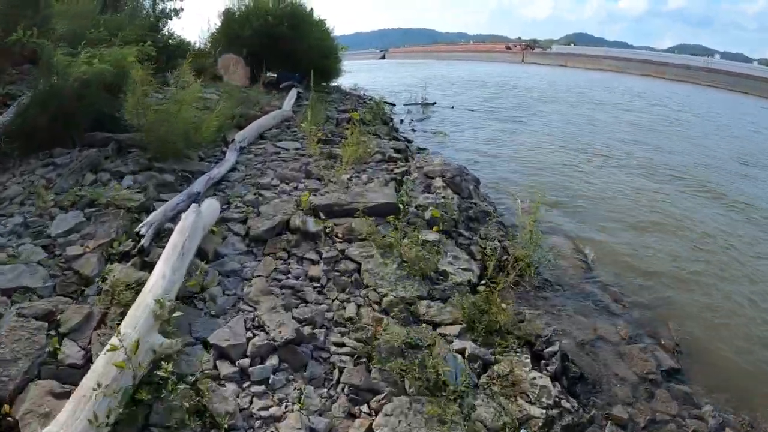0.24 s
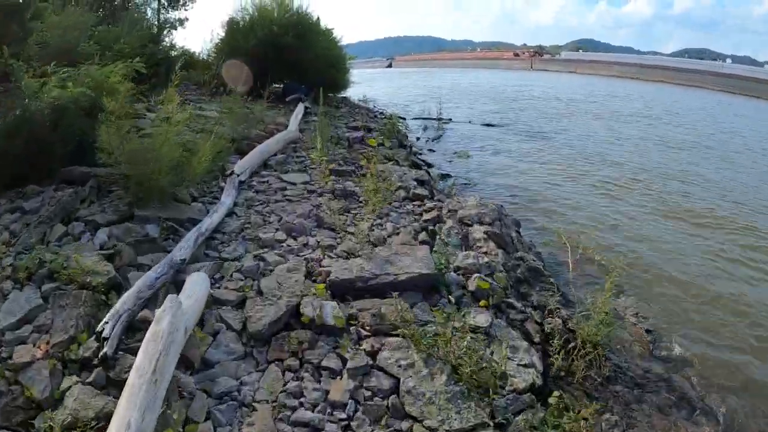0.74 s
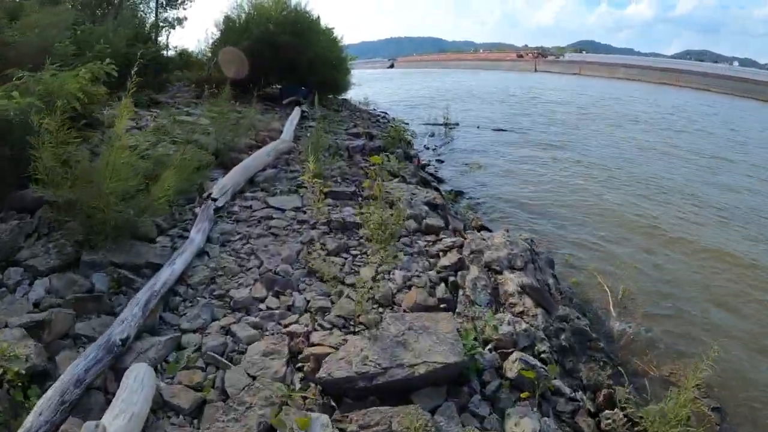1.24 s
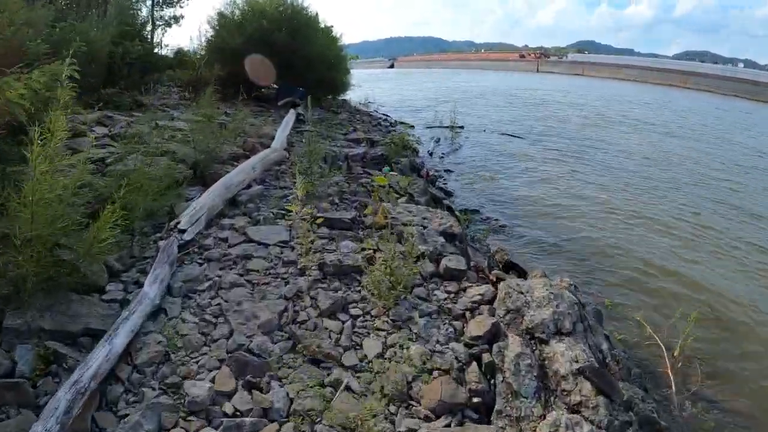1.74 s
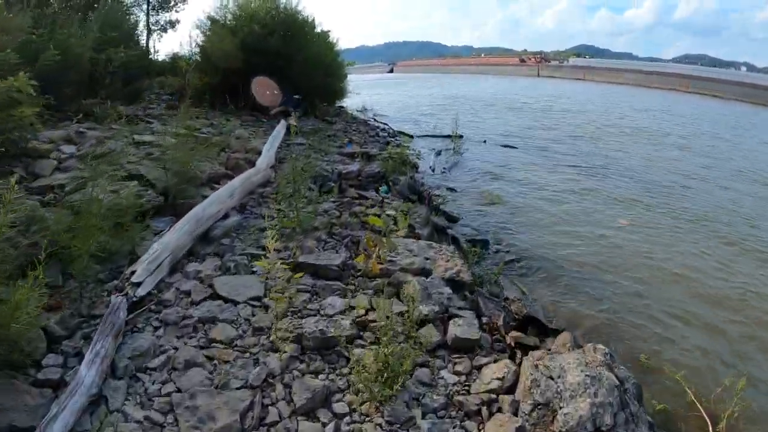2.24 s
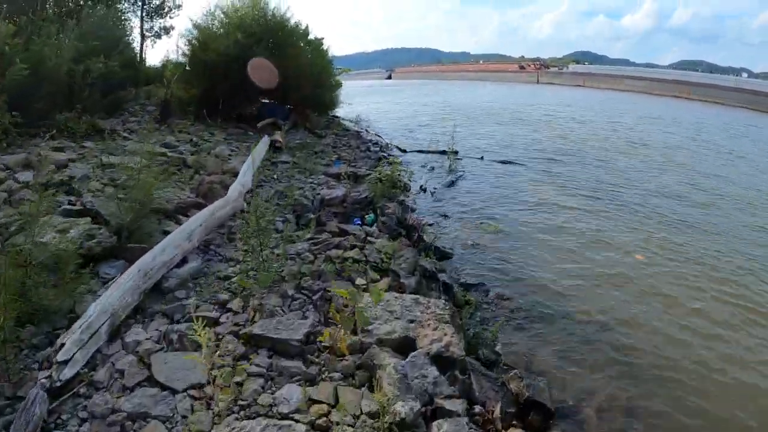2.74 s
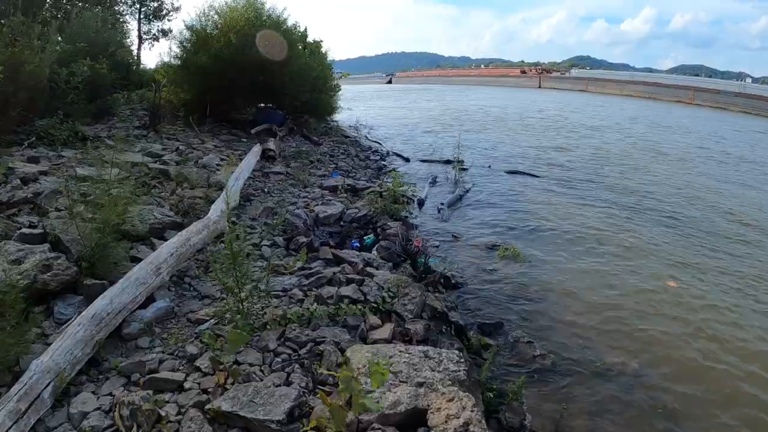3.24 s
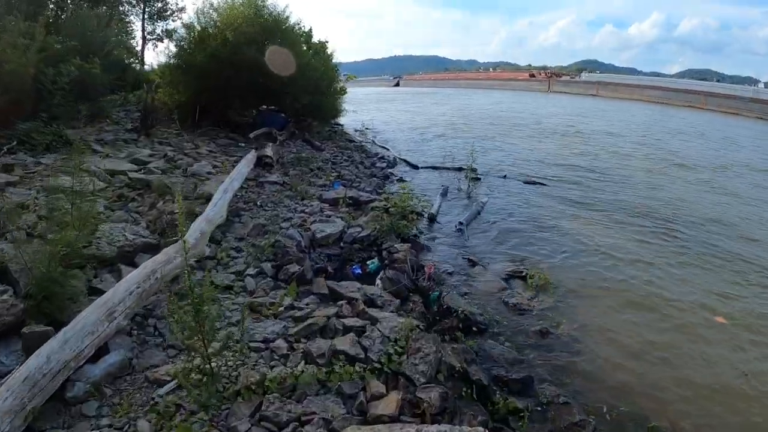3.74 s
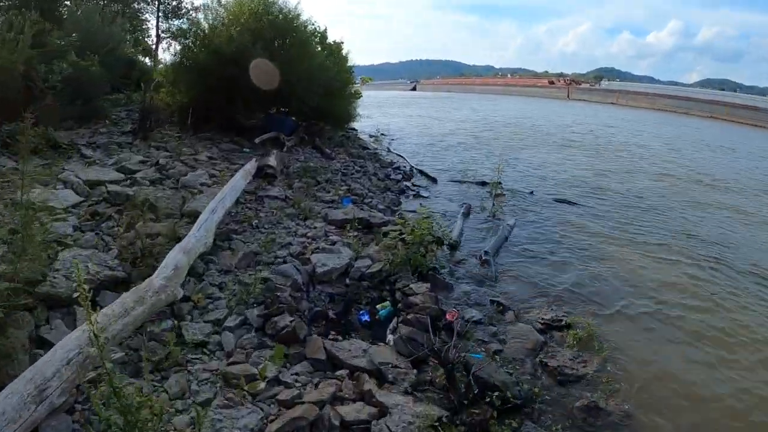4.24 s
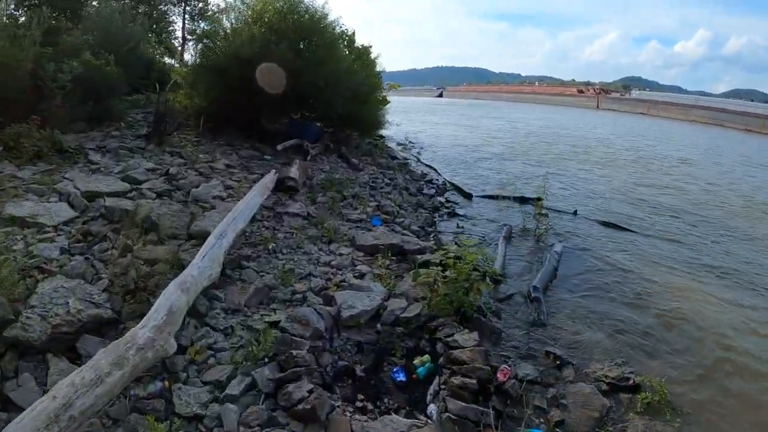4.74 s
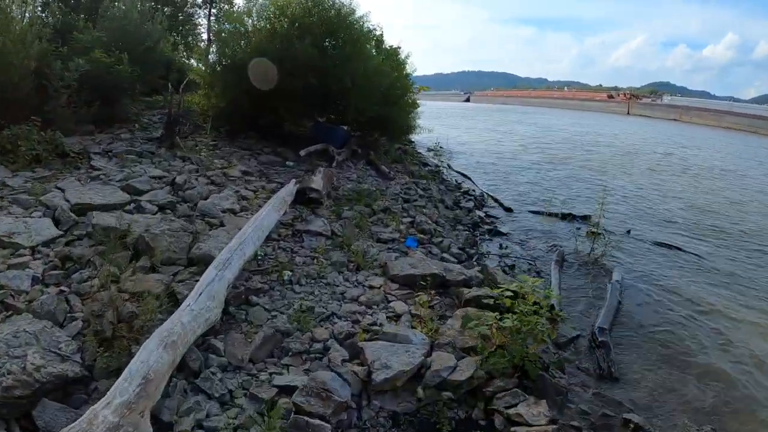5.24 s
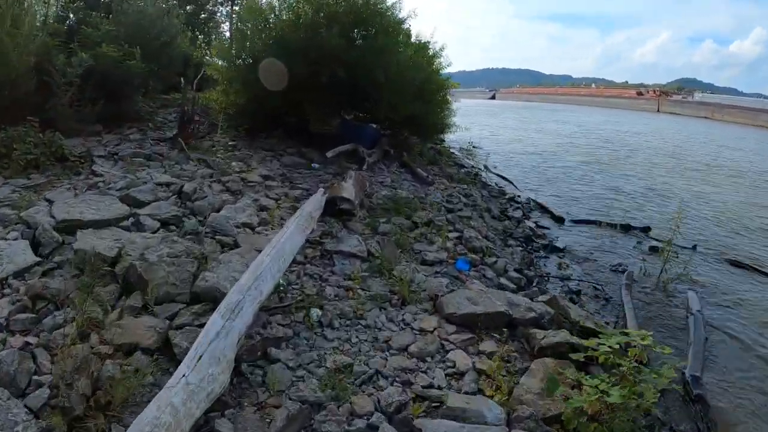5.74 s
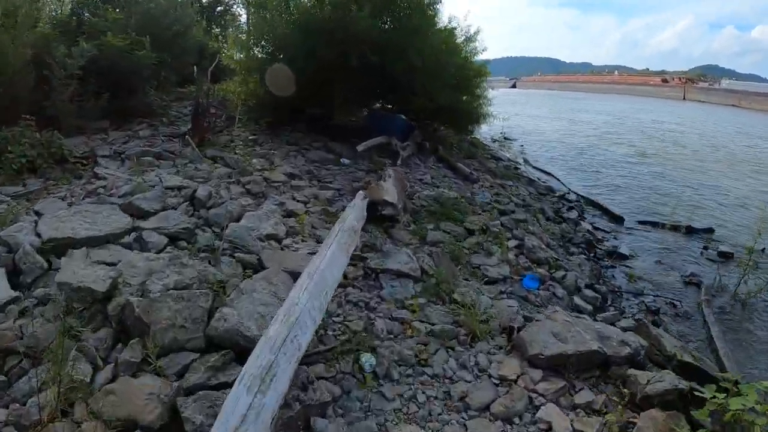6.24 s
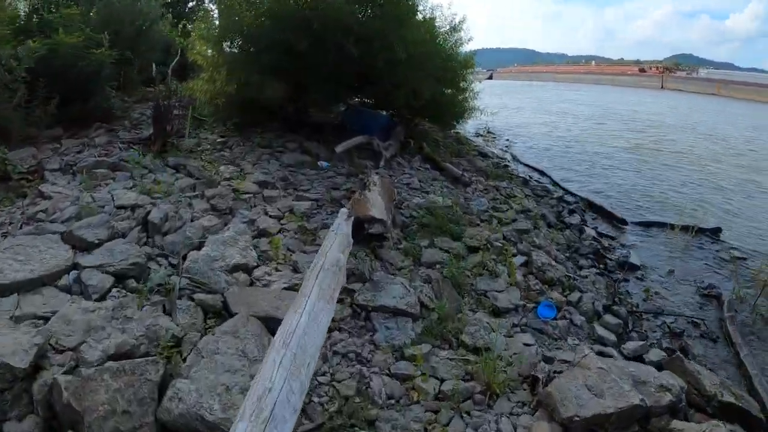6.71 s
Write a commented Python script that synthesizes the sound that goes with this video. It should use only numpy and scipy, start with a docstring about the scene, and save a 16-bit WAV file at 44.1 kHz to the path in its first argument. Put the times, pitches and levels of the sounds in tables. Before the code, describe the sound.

Shoes clack and crunch over loose river rocks while wind rumbles low on the microphone, insects shrill faintly and water laps softly alongside.

```python
"""Walking over loose riverbank rocks

Stones tip and clack in short ringing modes, soles thud, grit cracks, and shoes and weeds rub in showers of grains.
Insects shrill as narrow bands of noise. River and wavelets are shaped noise with small ringing bubbles.
Wind rocks and rumbles on the microphone as very low noise, stronger in each gust."""
import sys
import numpy as np
from scipy import signal
from scipy.fft import rfft, irfft, next_fast_len
from scipy.io import wavfile
from scipy.ndimage import uniform_filter1d, map_coordinates

SR = 44100
rng = np.random.default_rng(int(sys.argv[2]) if len(sys.argv) > 2 else 0)


def pcm_store(signal):
    """Save signal as 16-bit PCM."""
    levels = np.round(np.clip(np.atleast_2d(signal), -1, 1) * 32767)
    wavfile.write(sys.argv[1], SR, levels.astype(np.int16).T)


N = 307583
TIME = np.arange(N) / SR

# spectrum of the dull rub and of pebbles: pitch_hz [Hz], level_db [relative dB per Hz]
RUB_SPECTRUM = [(120, 4), (300, 3.5), (600, 5.5), (1100, 0.5), (1600, -4.5), (2400, -10.5), (4000, -11.5),
                (8000, -21)]
# spectrum of bright crackle and spray: pitch_hz [Hz], level_db [relative dB per Hz]
CRACKLE_SPECTRUM = [(800, -5), (2000, 0), (3500, -3), (5500, -2.5), (8000, -9.5), (11000, -17),
                    (15500, -29)]


def amp(db):
    """Turns decibels into a plain factor."""
    return 10 ** (np.asarray(db) / 20)


def unit(x):
    """Scales to rms 1."""
    return x / np.sqrt(np.mean(x ** 2) + 1e-20)


def follow(rows, axis):
    """One column of a curve at every sample; column 0 holds the times."""
    rows = np.asarray(rows)
    return np.interp(TIME, rows[:, 0], rows[:, axis])


def colour(x, points):
    """Filters x by a spectrum given as points (Hz, dB), and scales it to rms 1."""
    f, db = np.transpose(points)
    size = next_fast_len(len(x))
    hz = np.fft.rfftfreq(size, 1 / SR)
    gain = amp(np.interp(np.log(hz + 1e-3), np.log(f), db))
    return unit(irfft(rfft(x, size) * gain, size)[:len(x)])


def drift(per_s):
    """Smooth random wandering of rms 1, through per_s random points a second."""
    knots = rng.standard_normal(4096)
    coarse = TIME[::64]
    return unit(np.interp(TIME, coarse, map_coordinates(knots, [coarse * per_s], order=3)))


def add(mix, s, sound):
    """Mixes a sound in at s seconds, cut off at the end of the mix."""
    part = mix[max(round(s * SR), 0):][:len(sound)]
    part += sound[:len(part)]


def ring(t, hz, t60, rise):
    """A mode set going by a contact of about rise seconds, dying by 60 dB in t60 seconds."""
    return np.sin(2 * np.pi * hz * t) * amp(-60 * t / t60) * (1 - np.exp(-t / rise))


def grains(per_s, lo_hz, hi_hz, cycles, spread_db, count=32):
    """Many tiny rings at random moments, of random size and of count pitches, each dying by 60 dB in cycles."""
    out = np.zeros(N)
    for hz in np.geomspace(lo_hz, min(hi_hz, SR / 2), count):
        t = np.arange(int(cycles / hz * SR) + 8) / SR
        hit = rng.random(N) < per_s / count / SR
        size = amp(spread_db * np.minimum(rng.exponential(1, 2048), 4)) * rng.choice([-1, 1], 2048)
        clicks = np.zeros(N)
        clicks[hit] = np.resize(size, hit.sum())
        out += signal.oaconvolve(clicks, ring(t, hz, cycles / hz, .5 / hz) * hz)[:N]
    return unit(out)


def stroke(start, length):
    """The strength of a rub: it swells, holds and dies away; a long one takes longer to build up."""
    attack_s, release_s, swell_share = 0.0011, 0.041, 0.015
    t = TIME - start
    rise = attack_s + swell_share * length
    return np.sqrt(np.clip(t / rise, 0, 1)) * np.clip(1 - (t - length) / release_s, 0, 1)


def shrill(hz, width):
    """An insect's ring: a narrow, unsteady band around a pitch that may slide."""
    sos = signal.butter(2, width / 2, fs=SR, output="sos")
    wings = signal.sosfilt(sos, rng.standard_normal(N) + 1j * rng.standard_normal(N))
    phase = 2 * np.pi * np.cumsum(hz * np.ones(N)) / SR
    return unit((wings * np.exp(1j * phase)).real)


def wind(breeze_db=-35, gust_top_hz=101, lumpy_db=2, sway_db=-15.7, steady=0.51):
    """Eddies rumble on the microphone, deeper and stronger in gusts, above a slow heave of air pressure."""
    # gusts: height_s [s], length_s [s], level_db [dB before the low-pass]
    gust_rows = [(1.18, 0.39, -30.5), (1.824, 0.43, -30.5), (2.465, 0.22, -27), (2.761, 0.26, -36),
                 (3.338, 0.3, -34.5), (4.039, 1, -37), (4.734, 0.071, -33), (6.003, 0.16, -30.5),
                 (6.53, 0.31, -32), (6.826, 0.43, -34.5)]
    # spectra of the rumble and the heave: pitch_hz [Hz], level_db [relative dB per Hz]
    rumble_spectrum = [(12, -7.5), (20, 2), (31, 0.5), (44, -8.5), (66, -9.5), (77, -21.5), (140, -23),
                       (220, -31.5), (500, -46), (1500, -89)]
    sway_spectrum = [(1, -27.5), (3, 0), (5, -1), (13.5, -1), (16.5, -8.5), (20, -18), (30, -13.5),
                     (60, -110)]
    gusts = sum(amp(db) * np.cos(np.pi * np.clip((TIME - s) / length, -.5, .5)) for s, length, db in gust_rows)
    low_pass = signal.butter(2, gust_top_hz, fs=SR, output="sos")
    deep = signal.sosfilt(low_pass, colour(rng.standard_normal(N), rumble_spectrum))
    breeze = amp(breeze_db) * colour(rng.standard_normal(N), rumble_spectrum)
    rumble = (breeze + gusts * deep) * amp(lumpy_db * drift(per_s=13))
    heave = signal.hilbert(colour(rng.standard_normal(N + SR), sway_spectrum), next_fast_len(N + SR))
    # dividing by part of its own envelope evens out the heave
    heave = colour(heave.real / (abs(heave) + 0.058) ** steady, sway_spectrum)[SR // 2:][:N]
    ease = signal.windows.tukey(N, .02)  # short fades at both ends
    return rumble + amp(sway_db) * unit(heave) * ease


def river(swell_db=1.73, wash_db=0.5, lap_db=-7.5):
    """A soft wash from the open water, with small ringing bubbles that swell with it on each ripple."""
    # the water's level: time_s [s], level_db [dB before wash_db or lap_db]
    level = [(0, -49), (.7, -54.5), (1.1, -52), (1.6, -53), (2.2, -52.5), (3, -52), (3.5, -53), (4.3, -51),
             (4.7, -52), (5, -53), (5.25, -49), (6.1, -49.5), (6.97, -51)]
    # its spectrum: pitch_hz [Hz], level_db [relative dB per Hz]
    spectrum = [(70, 14.5), (150, -2), (240, 2.5), (360, 3.5), (600, -2), (1200, -3), (1800, -8.5),
                (2800, -12), (5000, -30), (8000, -17), (11000, -28), (15500, -32)]
    ripples = amp(follow(level, axis=1) + swell_db * drift(per_s=8.3))
    wash = colour(rng.standard_normal(N), spectrum)
    bubbles = grains(per_s=170, lo_hz=339.3, hi_hz=2368, cycles=74, spread_db=2.0, count=48)
    return ripples * (amp(wash_db) * wash + amp(lap_db) * colour(bubbles, spectrum))


def wavelets(fizz_db=-2.5, bubble_db=-3.5, spray_db=-21, surge_db=2.5):
    """Each wavelet swells and drains through the stones: a dense fizz, small bubbles and ticks of spray."""
    # wavelets: height_s [s], build_s [s], drain_s [s], level_db [dB before each layer's own level]
    waves = [(2.65, 0.33, 0.2, -51), (2.81, 0.33, 0.25, -59.5), (3.15, 0.47, 0.36, -49.5),
             (3.92, 0.41, 0.54, -56), (6.38, 0.28, 0.38, -49.5)]
    # spectra of the fizz and the bubbles: pitch_hz [Hz], level_db [relative dB per Hz]
    fizz_spectrum = [(120, -33), (240, 2), (360, 0.5), (620, -11.5), (1000, 2.5), (1500, -2), (2100, -9.5),
                     (2800, -10.5), (4500, -11), (7000, -17), (10000, -22.5), (15500, -41)]
    bubble_spectrum = [(350, -1), (600, 5.5), (900, 1.5), (1300, 3.5), (1700, 5), (2300, 2), (3200, 0),
                       (4500, -22)]
    power = 0
    for s, build, drain, db in waves:
        place = np.clip((TIME - s) / np.where(TIME < s, build, drain), -1, 1)
        power = power + (amp(db) * np.cos(np.pi / 2 * place)) ** 2
    fizz = colour(rng.standard_normal(N), fizz_spectrum)
    bubbles = grains(per_s=700, lo_hz=367, hi_hz=3850, cycles=31, spread_db=1.0, count=48)
    bubbles = colour(bubbles, bubble_spectrum)
    spray = grains(per_s=120, lo_hz=4000, hi_hz=14000, cycles=6.8, spread_db=17.0, count=8)
    spray = colour(spray, CRACKLE_SPECTRUM)
    water = amp(fizz_db) * fizz + amp(bubble_db) * bubbles + amp(spray_db) * spray
    return np.sqrt(power) * amp(surge_db * drift(per_s=25)) * water


def insects(centre_hz=5100, pull=.4, flutter_db=0.57, throb_db=0.5, waver_db=2.0, cicada_width_hz=560,
            trill_per_s=45, trill_depth_db=5):
    """Many distant insects merge in one shrill band that swells as they are passed; nearer ones slide and trill."""
    chorus_db, swell_db, nearest_s, pass_s = -55, 2.5, 3.4, 1.8
    # guide for the sliding chorus: time_s [s], pitch_hz [Hz, followed only in part, by pull]
    slide = [(0, 4726), (.6, 5330), (1.1, 4870), (1.8, 5186), (3.2, 4766), (4.1, 5344), (4.8, 5183),
             (5.6, 4868), (6.97, 4605)]
    # spectrum of the chorus before it slides: pitch_hz [Hz], level_db [relative dB per Hz]
    chorus_spectrum = [(2500, -28), (3300, -4), (4000, 1), (4600, 5), (5300, 2.5), (5850, 2), (6200, -1),
                       (6600, -4), (7800, -8), (8400, -25), (11000, -28)]
    # a nearer cicada: time_s [s], pitch_hz [Hz], level_db [dB before wavering]
    cicada = [(0, 5650, -66), (.3, 5650, -58), (.85, 5750, -64), (1.1, 5030, -63), (1.7, 5400, -62),
              (2.2, 5570, -61.5), (2.9, 5630, -62), (3.5, 5340, -66), (4.1, 5560, -58), (4.8, 5460, -63),
              (5.4, 5140, -58), (5.75, 4910, -60.5), (6.4, 4850, -60), (6.97, 4470, -66)]
    # thin trills: start_s [s], length_s [s], pitch_hz [Hz], width_hz [Hz], level_db [dB before pulsing]
    trills = [(2.5, 5.2, 9090, 260, -78.5), (6.647, .4, 9200, 200, -73)]
    speed = 1 + pull * (follow(slide, axis=1) / centre_hz - 1)
    band = colour(rng.standard_normal(N + N // 4), chorus_spectrum)
    # reading the noise faster or slower slides its pitch
    chorus = map_coordinates(band, [np.cumsum(speed)], order=3, mode="wrap")
    near = np.exp(-((TIME - nearest_s) / pass_s) ** 2)
    unsteady_db = throb_db * drift(per_s=4.9) + flutter_db * drift(per_s=66)
    out = chorus * amp(chorus_db + swell_db * near + unsteady_db)
    cicada_db = follow(cicada, axis=2) + waver_db * drift(per_s=15)
    out += shrill(follow(cicada, axis=1), cicada_width_hz) * amp(cicada_db)
    for start, length, hz, width, db in trills:
        singing = uniform_filter1d(1. * (TIME >= start) * (TIME < start + length), size=2048)
        pulses = amp(trill_depth_db * np.sin(2 * np.pi * trill_per_s * TIME + drift(per_s=9)))
        out += shrill(hz, width) * singing * pulses * amp(db + waver_db * drift(per_s=29))
    return out


def chirps():
    """One insect chirps on an even beat, each chirp sagging in pitch, and is slowly left behind."""
    first_s, every_s, half_s = 0.068, 0.1573, 0.017
    pitch_hz, sag_hz_per_s, width_hz = 7675, 2210, 87
    level_db, uneven_db, fade_db_per_s = -66, 2, 0.5
    beat = np.round((TIME - first_s) / every_s).astype(int)
    t = TIME - first_s - beat * every_s  # seconds from the middle of the nearest chirp
    db = level_db - fade_db_per_s * TIME + uneven_db * rng.standard_normal(beat.max() + 1)[beat]
    return shrill(pitch_hz - sag_hz_per_s * t, width_hz) * amp(db) * np.exp(-(t / half_s) ** 4)


def gulps(glide=0.26):
    """Water gulps between the rocks: a trapped bubble rises in pitch as it nears the surface."""
    # gulps: start_s [s], peak_db [dB], pitch_hz [Hz at the start], length_s [s]
    gulp_rows = [(5.211, -36.5, 520, 0.044)]
    out = np.zeros(N)
    for s, db, hz, length in gulp_rows:
        u = np.arange(int(length * SR)) / (length * SR)  # 0 to 1 through the gulp
        tone = np.sin(2 * np.pi * hz * length * (u + glide * u ** 2 / 2))
        add(out, s, amp(db) * tone * np.sin(np.pi * np.sqrt(u)) ** 2)
    return out


def pebbles(level_db=-71):
    """Small loose stones tick faintly at odd moments, each a short ring."""
    ticks = grains(per_s=34, lo_hz=720, hi_hz=2660, cycles=17, spread_db=10.0)
    return amp(level_db) * colour(ticks, RUB_SPECTRUM)


def gravel(per_s=260, cycles=17, spread_db=1.5):
    """Gravel shifts under a foot: small stones slip and tick together, each with a short ring of its own."""
    # shifts: start_s [s], length_s [s], level_db [dB]
    shifts = [(0.01, .03, -51), (0.519, 0.08, -50.5), (.77, 0.21, -58.5), (2.618, 0.23, -53),
              (3.03, 0.19, -53), (4.42, 0.028, -53), (5.337, 0.022, -51), (5.902, 0.092, -48),
              (6.253, 0.3, -51.5)]
    # spectrum: pitch_hz [Hz], level_db [relative dB per Hz]
    spectrum = [(350, -2), (700, 1), (1300, 4), (1900, -3.5), (3000, -18), (5000, -18)]
    ticks = grains(per_s=per_s, lo_hz=571, hi_hz=3080, cycles=cycles, spread_db=spread_db, count=24)
    return colour(ticks, spectrum) * sum(amp(db) * stroke(start, length) for start, length, db in shifts)


def scuffs(rub_db=-1, crackle_db=-1, pebble_db=-6, grit_db=-17, jerk_db=2.5):
    """Shoes scuff and weeds brush the legs in uneven slips: dull and bright grains, ringing pebbles, sharp grit."""
    # strokes: start_s [s], length_s [s], dull_db and bright_db [dB before each layer's own level]
    strokes = [(0, 0.034, -42, -52.5), (0.12, 0.097, -53, -77), (0.334, 0.068, -77, -67),
               (0.452, 0.072, -66, -56), (0.519, 0.069, -49.5, -55), (0.772, 0.12, -62.5, -59.5),
               (1.162, 0.098, -54, -53), (1.23, 0.019, -51, -61), (1.257, 0.099, -60, -62),
               (1.755, 0.058, -52.5, -60), (1.857, 0.052, -49.5, -68), (2.759, 0.18, -51, -76),
               (2.973, 0.039, -47, -48.5), (3.1, 0.26, -54.5, -57.5), (4.41, 0.14, -74, -52),
               (5.285, 0.06, -58, -72), (5.337, 0.031, -49, -57), (5.547, 0.5, -59, -80),
               (5.871, 0.082, -48.5, -50.5), (5.913, 0.071, -48, -48.5), (6.194, 0.056, -52, -49.5),
               (6.293, 0.17, -70, -55), (6.544, 0.12, -76, -63), (6.802, 0.22, -72, -58.5)]
    walk_dull_db, walk_bright_db = -64.5, -62.5  # light rustle between the strokes
    slips = amp(jerk_db * drift(per_s=70))
    rub = grains(per_s=1500, lo_hz=224.0, hi_hz=4320, cycles=6.1, spread_db=2.5)
    rub = colour(rub, RUB_SPECTRUM)
    stones = grains(per_s=230, lo_hz=559, hi_hz=3870, cycles=22, spread_db=3.5, count=32)
    stones = colour(stones, RUB_SPECTRUM)
    crackle = grains(per_s=3800, lo_hz=1600, hi_hz=14800, cycles=9.5, spread_db=3.0, count=20)
    crackle = colour(crackle, CRACKLE_SPECTRUM)
    grit = grains(per_s=34, lo_hz=7000, hi_hz=14000, cycles=2.9, spread_db=-9.0, count=8)
    grit = colour(grit, CRACKLE_SPECTRUM)
    # strokes that overlap add up as power
    dull, bright = amp(walk_dull_db) ** 2, amp(walk_bright_db) ** 2
    for start, length, dull_db, bright_db in strokes:
        push = stroke(start, length)
        dull = dull + (amp(dull_db) * push) ** 2
        bright = bright + (amp(bright_db) * push) ** 2
    dull_sound = np.sqrt(dull) * (amp(rub_db) * rub + amp(pebble_db) * stones)
    bright_sound = np.sqrt(bright) * (amp(crackle_db) * crackle + amp(grit_db) * grit)
    return slips * (dull_sound + bright_sound)


def snaps(peak_db=3.5, t60=0.018, tail_db=-23, tail_t60=0.17, spike_db=-3, spike_t60=0.0095):
    """Grit and dry stalks crack: noise hardest in its first instant, then a short spray of splinters."""
    # cracks: start_s [s], level_db [peak in dB before peak_db is added], pitch_hz [Hz]
    cracks = [(0.094, -36, 4240), (.2055, -47, 7700), (0.467, -39.5, 6900), (0.5387, -33, 5400),
              (1.2135, -51, 11000), (1.216, -33, 4600), (1.2274, -26, 5800), (1.2275, -29, 2950),
              (1.2892, -45, 8000), (1.812, -52, 10400), (2.0079, -40, 7500), (2.116, -49, 8000),
              (2.18, -51, 8620), (2.602, -51, 9500), (2.865, -52, 12500), (2.981, -44, 9600),
              (3.0057, -42, 8040), (3.1103, -40, 7400), (3.123, -43, 6960), (3.218, -43, 5700),
              (3.235, -32, 4530), (3.279, -37.5, 8500), (3.6742, -43, 7230), (4.446, -34.5, 5590),
              (5.8805, -38, 4100), (5.921, -37, 4300), (5.9428, -28.5, 4770), (5.945, -47, 8400),
              (6.221, -50, 11500), (6.226, -49, 9000), (6.353, -33.5, 5660), (6.406, -55, 9900),
              (6.565, -56, 10540), (6.588, -38, 4700)]
    # spectrum of a crack: pitch_factor [times its pitch], level_db [relative dB per Hz]
    crack_spectrum = [(.08, 4.5), (.3, -10), (.65, 5.5), (1.0, 16), (1.3, 2), (1.7, -6), (2.4, -49),
                      (4, -34)]
    out, t = np.zeros(N), np.arange(4096) / SR
    fade = amp(spike_db - 60 * t / spike_t60) + amp(-60 * t / t60) + amp(tail_db - 60 * t / tail_t60)
    for s, db, hz in cracks:
        crack = colour(rng.standard_normal(len(t)), np.array(crack_spectrum) * [hz, 1]) * fade
        add(out, s, amp(db + peak_db) * crack / abs(crack).max())
    return out


def thuds(level_db=-1, rise=0.002, overtone=1.465, overtone_db=-10):
    """Soles and heavy slabs settle: dull pushes, each a short low ring with a weaker overtone."""
    # thuds: start_s [s], peak_db [dB before level_db is added], pitch_hz [Hz], ring_cycles [cycles to fall 60 dB]
    thud_rows = [(0.02, -28, 286, 4.5), (.073, -28.5, 300, 8.9), (.082, -31, 515, 22),
                 (1.178, -35, 404, 8.3), (1.197, -33.5, 376, 7), (1.212, -31, 245, 5.5),
                 (1.5, -33, 514, 18), (2.499, -29, 131.1, 9.3), (2.723, -39, 435, 5.9),
                 (2.808, -36.5, 313, 10), (2.896, -27, 370, 2.1), (3.222, -40, 340, 14),
                 (3.279, -30, 344, 7), (3.962, -30.5, 337, 5.1), (4.196, -37.5, 330, 17.7),
                 (4.717, -34, 169, 5.8), (5.258, -35.5, 393, 9), (5.423, -33, 330, 4.3),
                 (5.952, -30, 190, 5.1), (6.4272, -21.5, 215, 5), (6.435, -29.5, 310, 6),
                 (6.4979, -25.5, 263, 3.5), (6.616, -33, 320, 9.8)]
    out, t = np.zeros(N), np.arange(4096) / SR
    for s, db, hz, cycles in thud_rows:
        t60 = cycles / hz
        push = ring(t, hz, t60, rise)
        push += amp(overtone_db) * ring(t, hz * overtone * rng.uniform(0.76, 1.146), t60, rise)
        add(out, s, amp(db + level_db) * push / abs(push).max())
    return out


def clacks(level_db=0, bed_db=-2, bed_lo_hz=220, bed_hi_hz=540, bed_t60=0.041, rise=0.0002,
           chatter=0.28, chatter_t60=0.022, top_hz=3400):
    """Stone knocks on stone: each slab rings in its modes, chatters as it seats, and shakes the rocks below."""
    # knocks: start_s [s], peak_db [dB], pitch_hz [Hz], hardness_db [dB added to the upper modes],
    # bed_level_db [rock bed in dB relative to the slab's peak, before bed_db],
    # looseness [factor on ring time and chatter]
    knocks = [(0.031, -31, 1780, 14, -23, 1), (0.0717, -35, 1150, 4, -8, .6),
              (0.0744, -26.5, 1780, -6, -5, 0.48), (.0815, -30.5, 1190, 13, -6, .7),
              (0.0841, -30.5, 566, 13, -15, 0.62), (0.0955, -29.5, 2400, -6, -11, 0.86),
              (.148, -34, 1090, -8, -15, 0.79), (0.1616, -23.5, 1040, 2.5, -9.5, 0.9),
              (0.1836, -27, 870, 8, -5, 1.7), (0.186, -32, 1270, -4, -14, .8),
              (0.29, -26.5, 1150, -1, -6, 2), (.32, -35, 900, 4, -12, 0.47),
              (0.5211, -26.5, 816, -7, -21, 0.45), (0.528, -25.5, 1060, -12, -23, 2.3),
              (0.5316, -31, 1100, -6, -14, 0.94), (0.536, -34, 1230, -3, -4, 0.94),
              (0.5426, -25.5, 980, -7, -5, 0.96), (0.5607, -29.5, 1170, -7, -4, 0.86),
              (0.568, -33, 1210, -1, -11, .6), (0.572, -33, 1070, 9, -2, 0.54),
              (0.588, -44.5, 613, -2, 18, 0.99), (0.598, -41, 1100, -5, -19, 0.76),
              (.919, -38, 1160, -8, -21, 1.9), (1.229, -34, 1410, 8, 1, 0.46),
              (1.238, -43, 1920, 4, -8, 0.54), (1.2947, -40, 2320, -5, -15, .6),
              (1.302, -35, 1070, 8, -8, 0.78), (1.3294, -31.5, 2200, 5, -1, 0.51),
              (1.5009, -39, 559, 18, 2, 0.8), (1.7917, -29.5, 983, -1, -7, 0.41),
              (1.797, -24.5, 1660, -8, -6.5, 0.6), (1.888, -35, 1670, 20, -18, 0.5),
              (1.895, -38, 2670, -6, -16, .7), (1.918, -29.5, 1050, 14, -3.5, 0.59),
              (2.037, -41.5, 1106, 1, -22, 2.5), (2.31, -40.5, 1860, -6, -21, 0.76),
              (2.367, -36, 870, -3, -18, 1.5), (2.429, -41, 2154, -8, -15, 0.83),
              (2.5375, -35, 805, -2, -16, 1.2), (2.807, -32, 840, 14, -11, 0.52),
              (2.992, -27.5, 700, -7, -16, 0.69), (2.9962, -25.5, 680, 6, -24, 1),
              (2.668, -38, 860, 0, -13, 1), (3.121, -35.5, 790, 0, -20, 1.7), (3.133, -44, 900, 4, -17, 1),
              (3.157, -35, 625, 18, -18, .8), (3.235, -31.5, 1500, 8, -17, 0.6),
              (3.2745, -28, 700, 4, -8, 0.32), (3.2803, -34, 640, 20, 1, 0.56),
              (4.1957, -37, 680, -3, -9, 1.1), (4.829, -42, 1364, -6, -24, 1.1),
              (5.3328, -18.5, 800, 8.5, -10, .6), (5.3331, -23.5, 1230, -5, -14, 1.3),
              (5.339, -23.5, 830, -8, -10, 0.29), (5.3447, -33, 1290, 7, -13, 0.46),
              (5.346, -37, 600, 10, 5.5, 0.8), (5.352, -31, 1160, 11, -15, 0.76),
              (5.358, -27, 1100, -5, -23, 0.66), (5.409, -31.5, 1730, -7, -26, 0.41),
              (5.8799, -25.5, 706, -2, -18, 0.86), (5.891, -35, 790, -1, -20, 0.58),
              (5.907, -46, 1410, 6, -14, .6), (5.921, -30, 1900, 8, -3, 0.66),
              (5.925, -31, 980, 14, -11, 0.83), (5.931, -32, 1050, 6, -14, 0.96),
              (5.944, -29, 1170, 23, -2, 0.43), (5.9557, -26, 1560, 10, -12, 0.8),
              (5.957, -32, 900, 5, -11, 1), (5.976, -35, 1070, 2, -16, 1.5),
              (5.988, -44, 1140, 0, -12, 0.74), (6.006, -29, 1020, -10, -24, 0.92),
              (6.218, -37, 1600, -6, -17, 0.74), (6.224, -28.5, 1650, -10, -8, 1.4),
              (6.231, -34, 730, -3, -18, 0.98), (6.259, -41, 674, -7, 7, 0.94),
              (6.302, -40, 960, 0, -12, 0.89), (6.347, -34, 1360, -11, -23, 1.5),
              (6.092, -46, 1960, -8, -20, .8), (6.115, -39, 2100, -8, -20, 0.67),
              (6.155, -39.5, 1350, -4, -21, 0.69), (6.293, -40, 1900, -6, -16, .8),
              (6.379, -33, 1370, -6, -24, 1.2), (6.456, -41, 1310, -6, -22, 1.5),
              (6.507, -38, 1210, -4, -20, 1.3), (6.433, -32.5, 1810, -8, -19, 1.3),
              (6.51, -38, 1880, -8, -21, 0.91), (6.5992, -35, 2825, -2, -27, 0.74),
              (6.6394, -29, 710, 3, -6.5, 0.79)]
    # modes of a slab: pitch_factor [times its pitch], level_db [dB], ring_factor [times its ring time]
    modes = [(.62, 0.5, 0.18), (.81, -10.5, 1), (0.999, 1.5, 0.8), (1.24, -19.5, 0.56), (1.57, -14, 0.8),
             (2.0, -11, 0.42), (2.6, -18, 0.82)]
    # a slab of slab_hz rings for slab_t60_s; higher ones die sooner, by this power of their pitch
    slab_hz, slab_t60_s, small_dies = 1000, 0.025, 0.24
    out, t = np.zeros(N), np.arange(4096) / SR
    ratio, mode_db, hold = np.transpose(modes)
    own = np.argmax(mode_db)  # the strongest mode, kept at its given pitch
    for s, db, hz, hard_db, below_db, loose in knocks:
        t60 = loose * slab_t60_s * (slab_hz / hz) ** small_dies
        # no two slabs are alike
        shape = 1 + 0.092 * rng.standard_normal(len(modes)) * (ratio != ratio[own])
        weight = rng.choice([-1, 1], len(modes)) * amp(mode_db + hard_db * (ratio > ratio[own + 1]))
        weight /= 1 + (hz * ratio / top_hz) ** 6  # a blunt contact barely excites the highest modes
        slab = weight @ ring(t, (hz * ratio * shape)[:, None], t60 * hold[:, None], rise)
        # about 900 contacts a second, quickly weakening
        contacts = rng.choice([-1, 1], len(t)) * (rng.random(len(t)) < 900 / SR)
        contacts = contacts * amp(-60 * t / chatter_t60)
        slab += loose * chatter * signal.fftconvolve(slab, contacts)[:len(t)]
        rocks_hz = np.geomspace(bed_lo_hz, bed_hi_hz, 4) * rng.uniform(.88, 1.12, size=4)
        bed = rng.choice([-1, 1], size=4) @ ring(t, rocks_hz[:, None], bed_t60, rise)
        knock = slab / abs(slab).max() + amp(below_db + bed_db) * bed / abs(bed).max()
        add(out, s, amp(db + level_db) * knock)
    return out


def bank(x, wet_db=-18, t60=0.019):
    """The rocks around scatter a faint, short echo, as random reflections after the first 4 ms."""
    t = np.arange(8192) / SR
    taps = rng.standard_normal(len(t)) * (rng.random(len(t)) < 2000 / SR)
    taps = taps * amp(-60 * t / t60) * (t > .004)
    return x + amp(wet_db) * signal.oaconvolve(x, taps / np.linalg.norm(taps))[:N]


def scene():
    """Steps on the rocks, amid river, insects and wind."""
    surroundings = wind() + river() + wavelets() + insects() + chirps()
    steps = bank(gulps() + pebbles() + snaps() + thuds() + clacks()) + gravel() + scuffs()
    return (surroundings + steps)[None]


def record(dry):
    """The recorder's band limit: a low-pass that takes away the highest treble."""
    edge_hz = 15720
    taps = signal.firwin(511, edge_hz, window=("kaiser", 9), fs=SR)
    padded = np.pad(dry, ((0, 0), (255, 255)), "reflect", reflect_type="odd")
    return signal.oaconvolve(padded, taps[None], "valid")


dry = scene()
out = record(dry)
pcm_store(out)
```